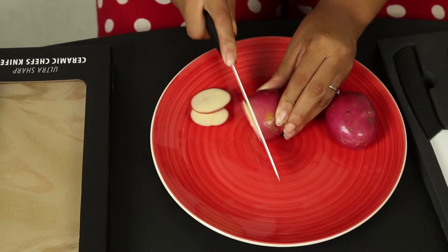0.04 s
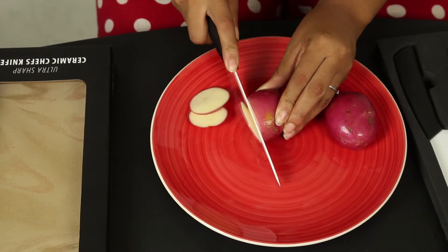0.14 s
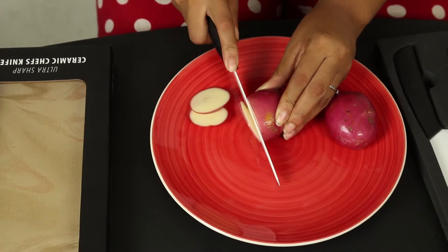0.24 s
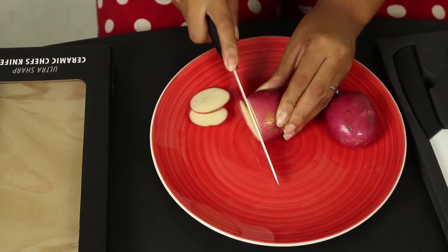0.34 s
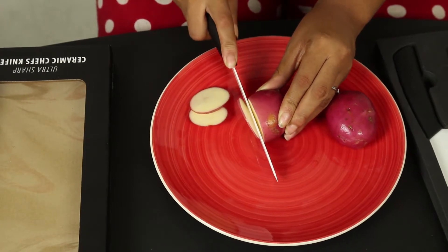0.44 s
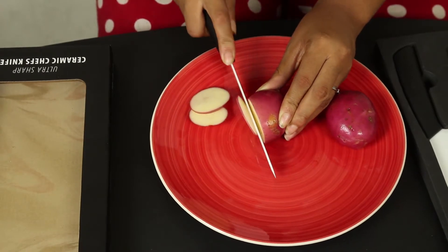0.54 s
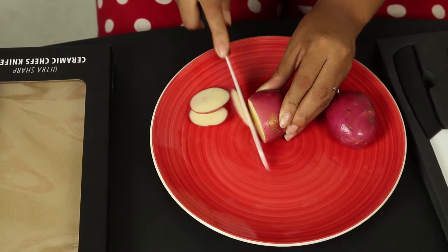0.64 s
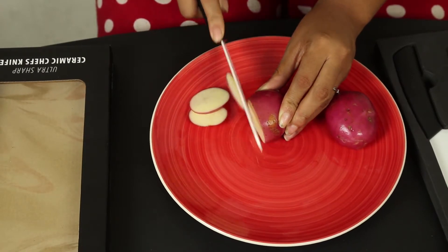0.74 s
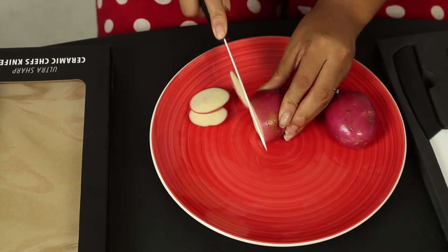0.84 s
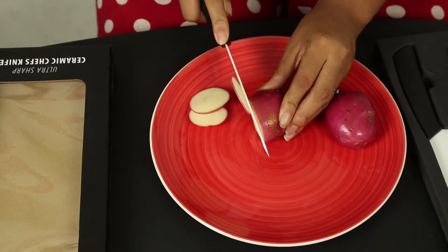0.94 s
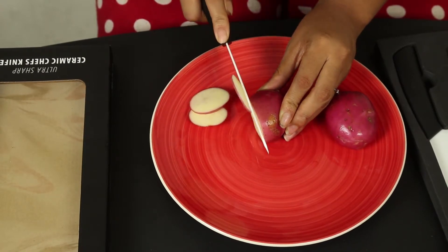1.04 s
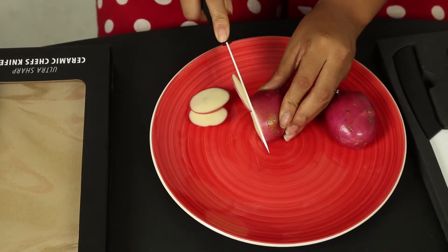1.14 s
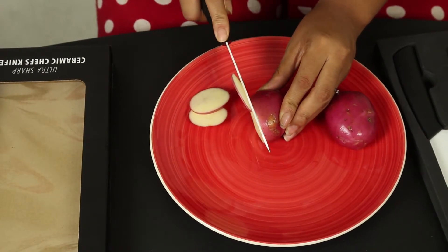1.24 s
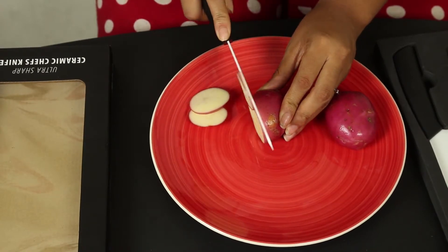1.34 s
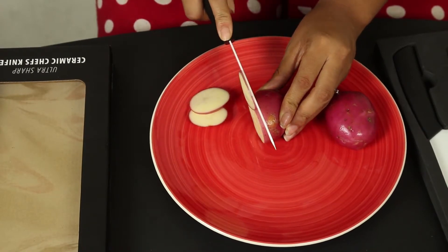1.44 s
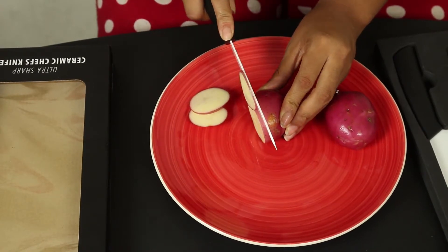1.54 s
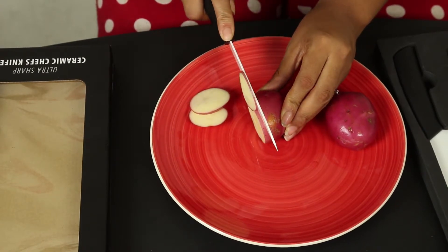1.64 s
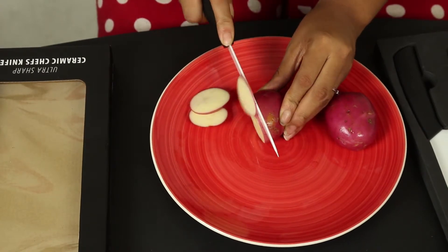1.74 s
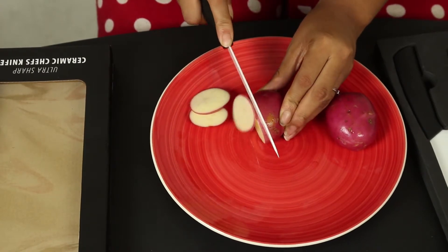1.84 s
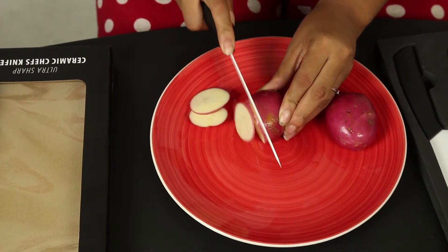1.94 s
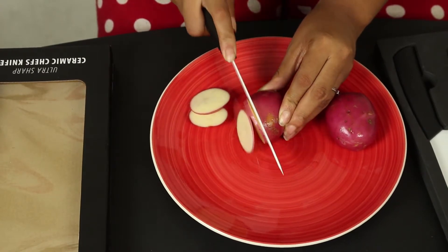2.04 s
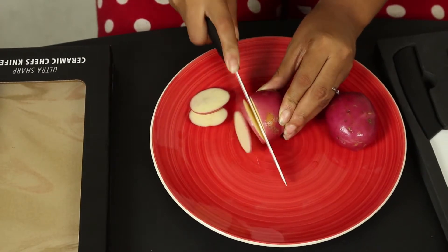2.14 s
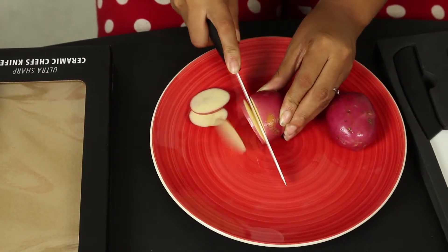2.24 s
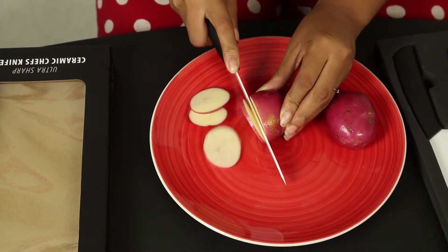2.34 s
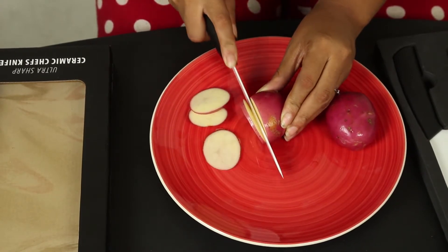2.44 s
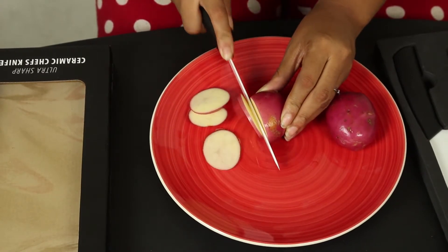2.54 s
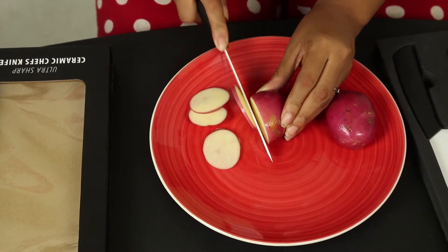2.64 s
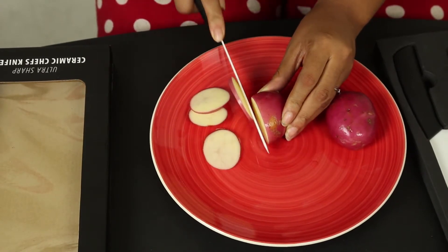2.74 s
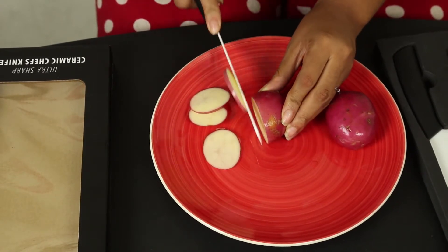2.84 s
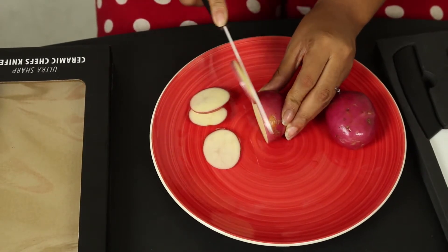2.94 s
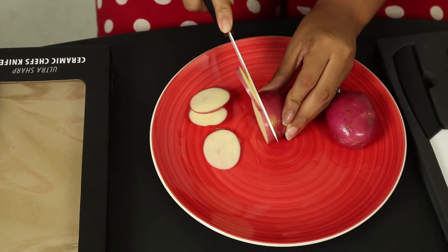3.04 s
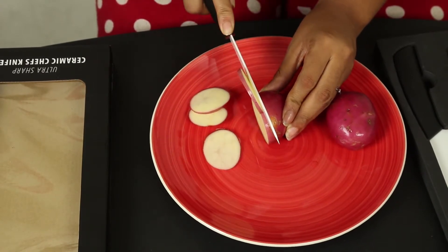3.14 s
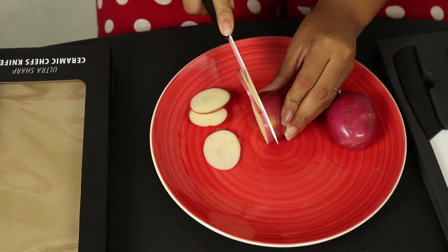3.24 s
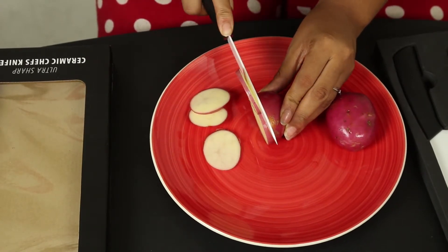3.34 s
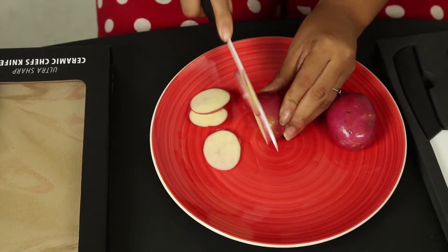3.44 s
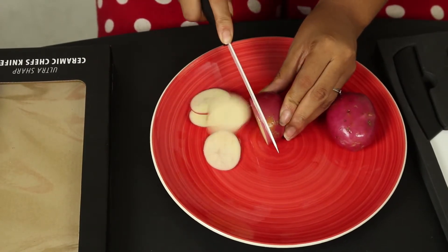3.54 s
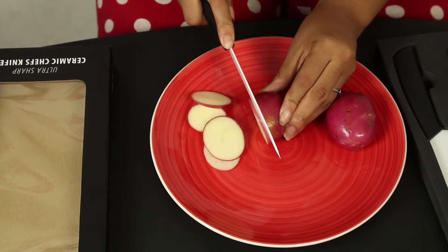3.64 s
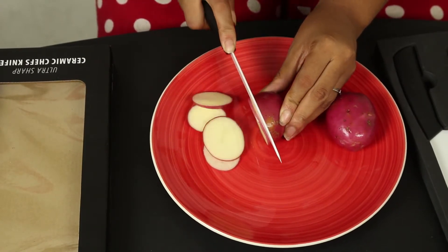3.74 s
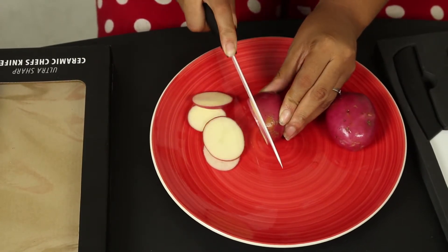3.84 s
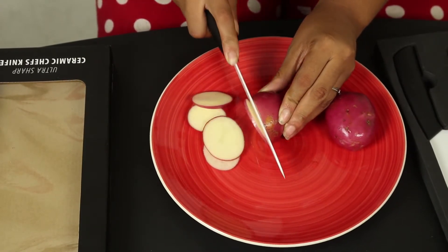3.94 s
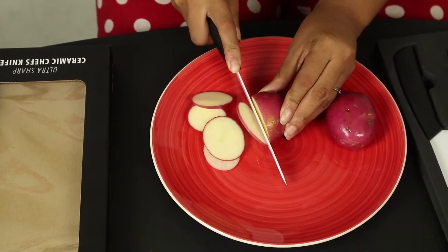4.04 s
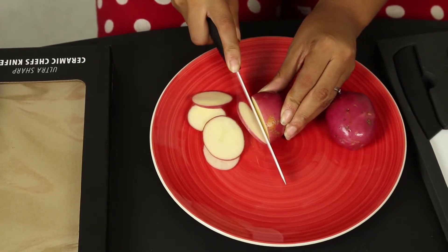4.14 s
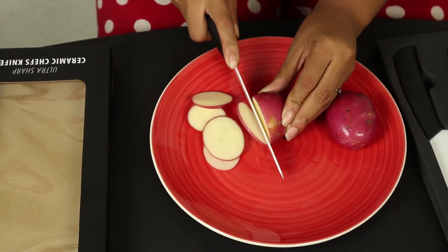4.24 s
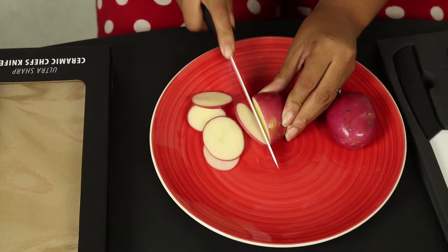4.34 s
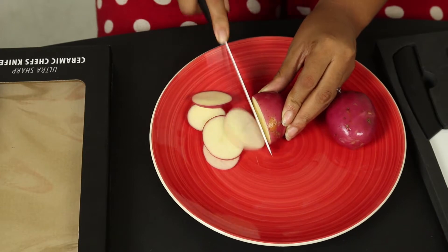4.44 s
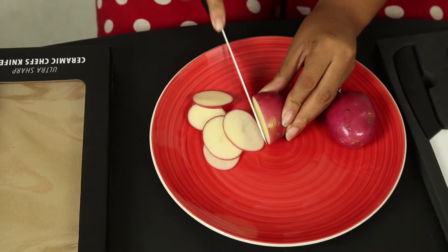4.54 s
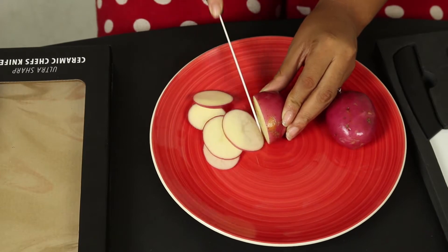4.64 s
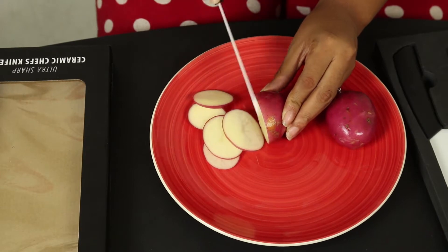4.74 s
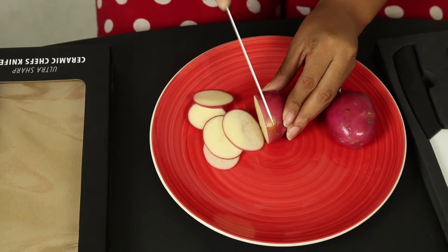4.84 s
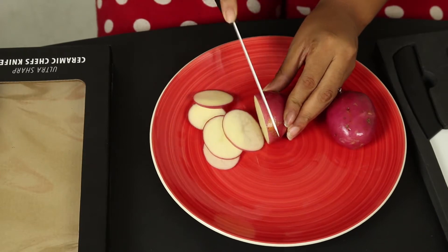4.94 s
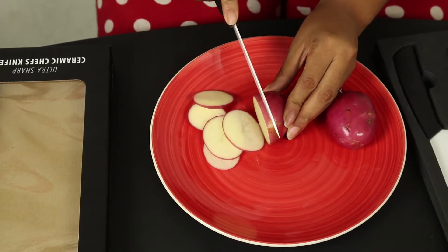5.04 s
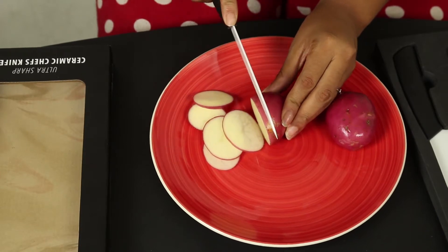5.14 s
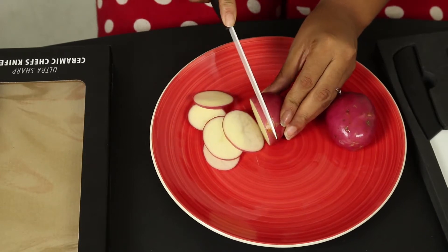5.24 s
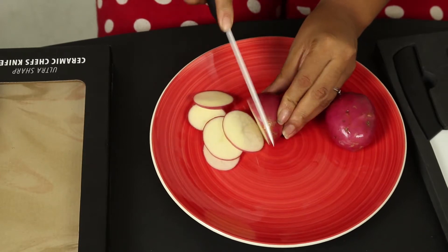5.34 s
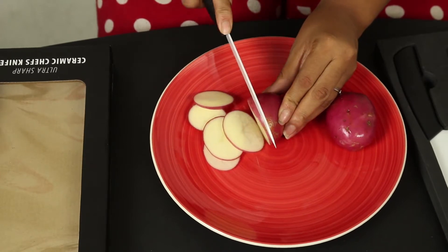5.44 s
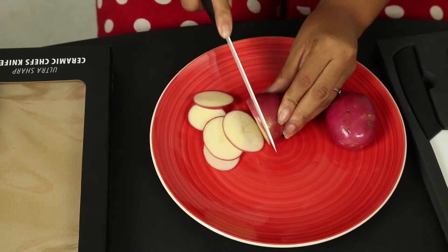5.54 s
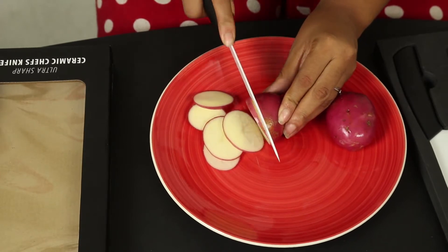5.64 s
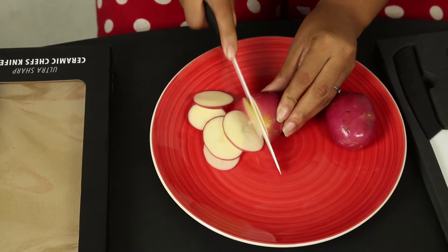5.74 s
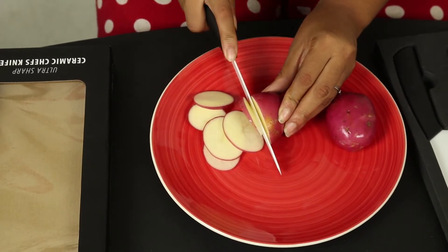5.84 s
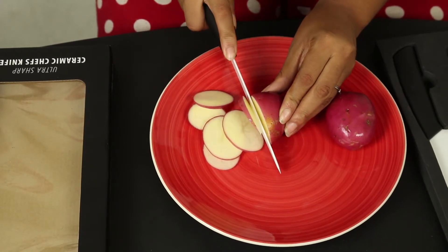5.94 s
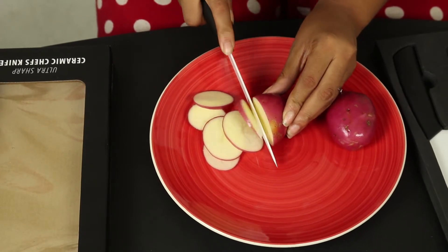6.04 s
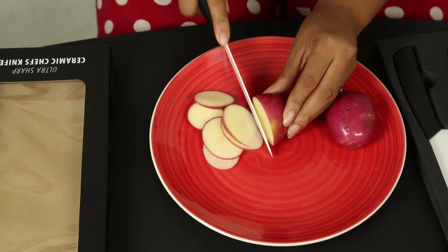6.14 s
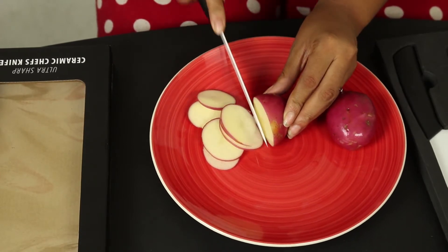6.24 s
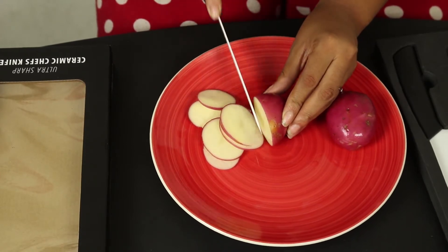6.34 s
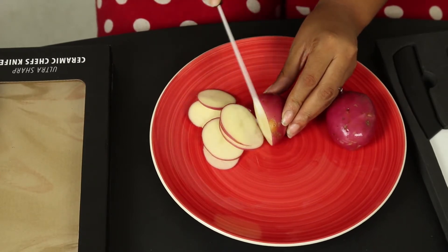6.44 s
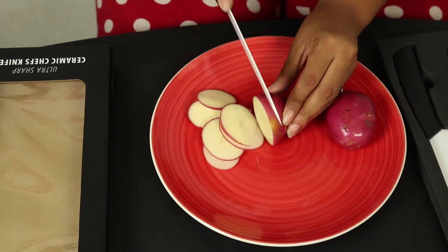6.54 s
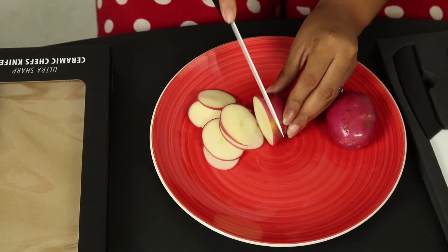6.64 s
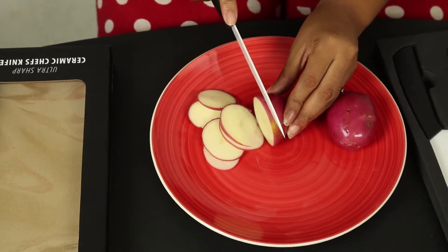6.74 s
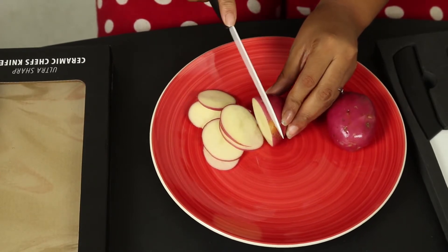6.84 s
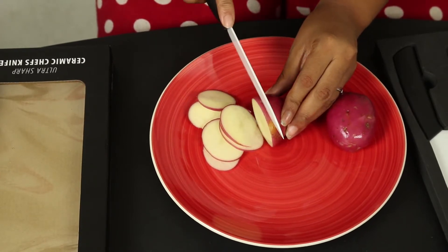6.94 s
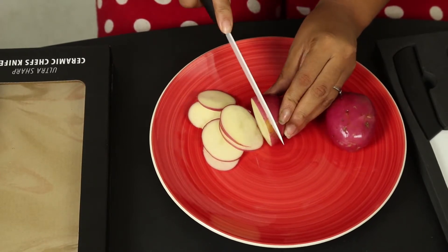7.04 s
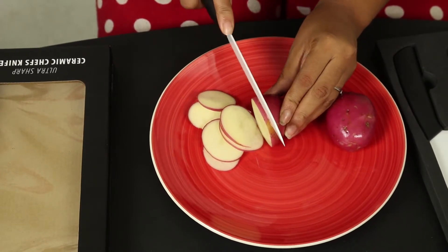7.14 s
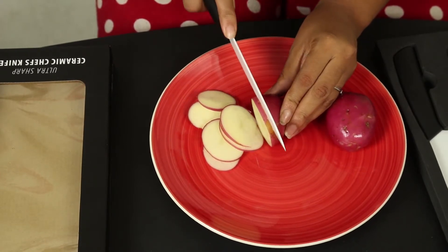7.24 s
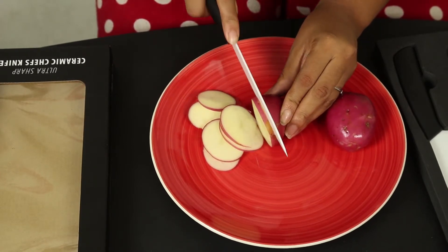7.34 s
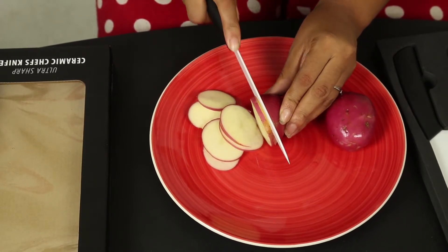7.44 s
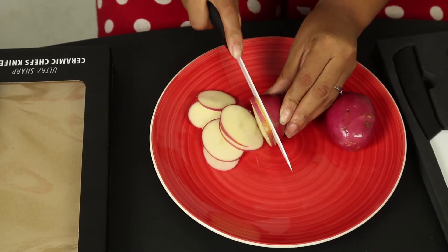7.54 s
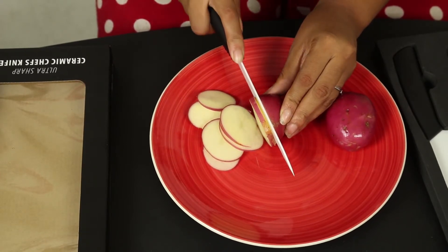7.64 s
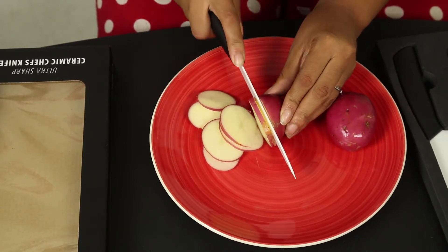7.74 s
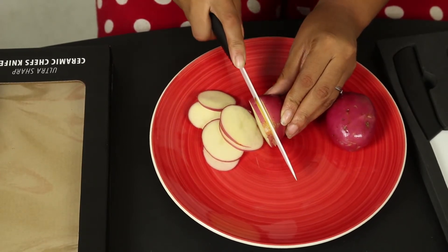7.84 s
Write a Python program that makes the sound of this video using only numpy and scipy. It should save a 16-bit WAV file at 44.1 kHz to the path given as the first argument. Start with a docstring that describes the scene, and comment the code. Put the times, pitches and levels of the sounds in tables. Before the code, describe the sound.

A ceramic knife slices raw potatoes on a glazed plate, heard close in a small kitchen with a short echo and a steady, soft hum of appliances and air. A faint wet cut opens, followed by a light scrape and tiny ticks around 0.5 seconds. At 1.8 seconds the skin crunches, the blade hisses through the flesh, and at 2.2 it hits the plate with a very loud, slightly distorted clack. A ringing scrape and a tap follow. Another crunch at 3.5 leads to a second hard knock at 4.1, then gritty scraping and sharp clicks around 4.5. The third cut starts at 5.4 and ends in the strongest knock at 5.8, with scraping and a tap until 6.3. Dull thumps through the table accompany the work. From about 7 seconds comes a softer crunch and quiet, moist slicing.

```python
"""A quiet kitchen, close up: a ceramic knife slices raw potatoes on a glazed plate.
The edge crunches through the skin, hisses through the wet flesh and knocks on the plate hard enough
to clip, then scrapes over the glaze and sets it ringing. Edge and falling slices tap lightly;
slices and hands thump the table. A small room rings over a soft hum of appliances and air."""
import sys
import numpy as np
from scipy import signal
from scipy.fft import rfft, irfft, next_fast_len
from scipy.io import wavfile
from scipy.ndimage import uniform_filter1d

SR = 44100
rng = np.random.default_rng(int(sys.argv[2]) if len(sys.argv) > 2 else 0)


def digitize_waveform(pressure):
    """Quantize a signal to 16-bit integers and store it at the path in sys.argv[1].

    Rows of a 2-D input are taken as channels; values are limited to [-1, 1].
    """
    field = np.atleast_2d(pressure).T
    bounded = np.clip(field, -1, 1)
    quanta = np.round(bounded * 32767).astype(np.int16)
    wavfile.write(sys.argv[1], SR, quanta)


N = 347949
TIME = np.arange(N) / SR

# tone of the appliance and air noise: frequency_hz, level_db
HUM_EQ = [(12, -30), (20, 0), (81, -3), (154, -3.5), (311, -6.5), (400, -5), (435, -7), (529, -14),
          (2200, -25), (2400, -27.5), (3170, -25), (3450, -27), (16100, -36.5)]
# thin whines in the hum: centre_hz, width_hz, level_db
WHINE_BANDS = [(2420, 70, -70.5), (3370, 40, -77)]
# stereo width of the room, side against mid: frequency_hz, side_db
WIDTH_EQ = [(60, -16), (400, -9), (2000, 2), (8000, -1)]
# blade through flesh, hiss set against ring: start_s, length_s, first_db, last_db, swell_db, hiss_db
CUT_STROKES = [(0.0, 0.16, -50.5, -38.5, -7.5, -4), (1.928, 0.27, -46.5, -40, -12.5, -2),
               (3.635, .2, -50.5, -67, -1, -3.5), (3.865, .195, -52.5, -43, 4, -5),
               (5.572, 0.22, -52.5, -42, -5.5, -2.5), (7.2, .19, -65.5, -58.5, 2.5, -3.5),
               (7.44, 0.16, -54, -56.5, 0.5, -3.5), (7.6, 0.21, -56, -57, 0.5, -7.5)]
# edge breaking the skin: start_s, level_db, crunch_s, plate_share_db
SKIN_BITES = [(1.766, -35, 0.021, -9), (3.489, -39, 0.024, 1.5), (5.389, -40.5, 0.026, 1),
              (7.06, -43, 0.033, 1)]
# tone of the wet flesh: frequency_hz, level_db
FLESH_EQ = [(290, -49.5), (500, -18.5), (1020, -31.5), (1400, -8.5), (2010, -17.5), (2330, -12),
            (2930, -12.5), (5020, -13), (16000, -21.5)]
# plate ringing along under the cut: pitch_hz, width_hz, level_db
CUT_MODES = [(1416, 90, -1), (2353, 80, -1.5), (3333, 68, -15), (3800, 100, -8), (5690, 130, -15),
             (8150, 300, -15)]
# soft blows through the table: start_s, level_db, pitch_hz, t60_s
TABLE_THUMPS = [(0.048, -45, 417, 0.43), (1.763, -36, 220.4, 0.21), (1.864, -44.5, 174.5, 0.81),
                (2.202, -28.5, 115, 0.13), (2.635, -35.5, 351, 0.17), (3.074, -46, 153, 0.17),
                (3.484, -37.5, 221, 0.24), (3.619, -40, 169.3, 0.41), (4.062, -25, 114, 0.096),
                (4.437, -36, 347, 0.47), (4.588, -36.5, 348, 0.11), (4.995, -44.5, 151.3, 0.14),
                (5.389, -42, 154, 0.33), (5.803, -24, 194, 0.17), (6.155, -28.5, 374, 0.2),
                (6.713, -47, 159, 0.19), (7.059, -44.5, 140, 0.13)]
# edge tapping and slices falling flat: start_s, peak_db, centre_hz, fade_s, plate_share_db
LIGHT_TAPS = [(.366, -40.5, 1586, 0.016, -10), (.628, -27, 7200, .003, -14), (.682, -25.5, 6500, .003, -11),
              (2.640, -18.5, 1450, 0.0041, -9), (3.620, -43, 2510, 0.0067, -20),
              (3.646, -37, 3500, 0.0062, -11), (4.438, -19.5, 1530, 0.014, -4),
              (4.586, -8, 2606, 0.0045, -4.5), (6.158, -12.5, 2420, 0.015, -10)]
# plate under the sliding edge: pitch_hz, width_hz, level_db
RUBBED_MODES = [(1335, 86, -2.5), (1656, 260, -9.5), (1985, 240, -4.5), (2298, 220, 1), (2522, 350, -6),
                (3170, 140, -8.5), (3967, 290, -1.5), (5260, 300, -14), (5700, 310, -12.5),
                (7853, 400, -25.5), (6817, 135, -6), (8600, 180, -13.5), (11330, 190, -23.5)]
# edge over glaze, hiss set against ring: start_s, length_s, first_db, last_db, swell_db, hiss_db
SCRAPE_STROKES = [(.405, 0.13, -47, -49, 5.5, -20), (.505, 0.17, -51, -37.5, 9, -20.5),
                  (2.4, 0.25, -40, -33, 4, -21), (2.652, 0.041, -33, -53, 2, -13),
                  (2.755, 0.037, -48, -54, 0, -15), (4.24, 0.15, -42.5, -28, 2.5, -20),
                  (4.416, 0.018, -36, -23.5, -1, -21), (4.45, 0.032, -35, -51, -4, -23),
                  (4.514, 0.074, -30, -26.5, 0.5, -10), (4.6, 0.041, -28.5, -54, -7, -16),
                  (6.03, 0.048, -39.5, -39.5, 6.5, -20), (6.082, 0.063, -29, -24.5, -3.5, -32),
                  (6.172, 0.045, -22.5, -35.5, -10, -31), (6.233, 0.087, -23.5, -35.5, 0, -10.5)]
# blade hitting the plate: start_s, level_db, tilt_db_per_octave, low_modes_db, mid_modes_db, chatter_s
PLATE_KNOCKS = [(2.1988, 2, -1, -2.5, -2, 0.016), (4.0658, 0, -3.5, -2.5, -1.5, 0.018),
                (5.8048, 3.5, -0.5, 4, 3.5, 0.017)]
# plate struck by the blade: pitch_hz, width_hz, level_db
KNOCK_MODES = [(1402.5, 320, -10), (1562, 260, -8), (1950, 220, -22), (2219, 86, -12.5), (2344, 140, 0.5),
               (2939, 120, -17), (3260, 260, -15.5), (3767, 160, -2), (3908, 150, -2.5), (4570, 31, -20),
               (4970, 33, -17), (5048, 390, -3.5), (5256, 220, -5), (5855, 230, -18), (6780, 84, 1.5),
               (7700, 190, -21), (8957, 450, -8), (9200, 370, -33), (10670, 160, -26), (12200, 910, -31.5),
               (14300, 280, -29.5)]
# tone of a knock's crack: frequency_hz, level_db
CRACK_EQ = [(59, -54), (100, -17), (1910, -4.5), (2320, 1), (3190, -13), (3700, 8), (5650, -11),
            (9020, -34.5), (16000, -39.5)]


def undb(db):
    """Decibels to gain."""
    return 10 ** (np.asarray(db) / 20)


def level(x, db):
    """Set the RMS level."""
    return x * undb(db) / np.sqrt(np.mean(x ** 2))


def equalise(x, points):
    """Shape the spectrum along (frequency_hz, level_db) points."""
    size = next_fast_len(x.shape[-1])
    hz, db = np.transpose(points)
    bin_hz = np.arange(size // 2 + 1) * SR / size
    gain = undb(np.interp(np.log(bin_hz + 1), np.log(hz), db))
    return irfft(rfft(x, size) * gain, size)[..., :x.shape[-1]]


def band(x, hz, width_hz):
    """A resonance with gain 1 at its centre."""
    return signal.lfilter(*signal.iirpeak(hz, hz / width_hz, SR), x)


def add(out, start_s, sound):
    """Mix a sound in at its cue."""
    start = int(start_s * SR)
    out[:, start:start + sound.shape[-1]] += sound[..., :N - start]


def room_noise(samples):
    """Stereo noise, centred in the bass and wide in the treble."""
    mid, side = rng.standard_normal((2, samples))
    return mid + equalise(side, WIDTH_EQ) * np.array([[1], [-1]])


def appliance_hum(bed_db=-52):
    """A soft bed of appliance and air noise with two thin whines."""
    air = room_noise(N)
    whine = sum(level(band(air, hz, width_hz), db) for hz, width_hz, db in WHINE_BANDS)
    return level(equalise(air, HUM_EQ), bed_db) + whine


def stroke_envelopes(strokes, attack_s, release_db_per_s):
    """Ring and hiss gains: each stroke ramps from first to last level, swelling or dipping midway."""
    ring, hiss = np.zeros((2, N))
    for start_s, length_s, first_db, last_db, swell_db, hiss_db in strokes:
        age = TIME - start_s
        progress = np.clip(age / length_s, 0, 1)
        db = first_db + (last_db - first_db) * progress + swell_db * np.sin(np.pi * progress)
        release_db = release_db_per_s * np.maximum(age - length_s, 0)
        stroke = undb(db - release_db) * np.clip(age / attack_s, 0, 1)
        ring = np.maximum(ring, stroke)
        hiss = np.maximum(hiss, stroke * undb(hiss_db))
    return ring, hiss


def grit(spread_db, flicker_db, flicker_hz):
    """Dense one-sample grains of uneven size under a flickering pressure."""
    hold = int(SR / flicker_hz)
    steps = np.repeat(rng.standard_normal(N // hold + 1), hold)
    pressure = uniform_filter1d(steps, hold)[:N]
    grain_size = np.minimum(rng.exponential(size=N), 4)
    return rng.standard_normal(N) * undb(spread_db * grain_size + flicker_db * pressure)


def plate_ring(force, modes, low_cut_hz=1180):
    """The plate's resonances at unit RMS; it radiates little below its lowest mode."""
    out = 0
    for k, (hz, width_hz, db) in enumerate(modes):
        ring = band(force, hz, width_hz)
        ring = (-1) ** k * undb(db) * (.7 * ring + band(ring, hz, 1.5 * width_hz))
        # each mode reaches left and right up to two samples apart
        out = out + np.array([np.roll(ring, 2), np.roll(ring, rng.integers(0, 5))])
    low_cut = signal.butter(6, low_cut_hz, "high", fs=SR, output="sos")
    return level(signal.sosfilt(low_cut, out), 0)


def slicing(swell_db=7, swell_s=.015, shake_db=-17, shake_s=.05):
    """Cells burst along the edge: a crunch at the skin, then a wet hiss; the plate rings along."""
    ring, hiss = stroke_envelopes(CUT_STROKES, attack_s=.012, release_db_per_s=598)
    for knock_s, *_ in PLATE_KNOCKS:  # hiss and ring swell briefly around each knock
        swell = undb(swell_db * np.exp(-np.abs(knock_s - TIME) / swell_s))
        ring, hiss = ring * swell, hiss * swell
    crunch, push = np.zeros((2, 1, N))
    t = TIME[:SR // 4]
    attack = np.minimum(t / .0015, 1)
    for start_s, level_db, crunch_s, plate_share_db in SKIN_BITES:
        burst = undb(level_db) * attack * np.exp(-(t / crunch_s) ** 1.8)
        shake = undb(level_db + shake_db) * attack * np.exp(-t / shake_s)  # the plate shakes on
        add(crunch, start_s, burst)
        add(push, start_s, burst * undb(plate_share_db) + shake)
    cells = grit(spread_db=1.8, flicker_db=2, flicker_hz=60)
    wet = level(equalise(cells, FLESH_EQ), 0) * (hiss + crunch)
    return wet + plate_ring(cells, CUT_MODES) * (ring + push)


def table_thumps():
    """Dull blows: the table top answers with a low mode and a loose rattle that lasts twice as long."""
    out, t = np.zeros((2, N)), TIME[:SR // 2]
    attack = np.minimum(t / .0015, 1)
    for start_s, level_db, pitch_hz, t60_s in TABLE_THUMPS:
        mode = np.sin(2 * np.pi * pitch_hz * t) * 1000. ** (-t / t60_s)
        rattle = band(rng.standard_normal(len(t)), .69 * pitch_hz, 180)
        rattle = level(band(rattle, 210, 310), -4.5) * 1000. ** (-t / (2 * t60_s))
        add(out, start_s, undb(level_db) * (mode + rattle) * attack)
    return out


def light_taps():
    """Edge or slice lands: a sharp tick with a trace of rattle and a short ring of the plate."""
    out, t = np.zeros((2, N)), TIME[:SR // 8]
    for start_s, peak_db, hz, fade_s, plate_share_db in LIGHT_TAPS:
        force = .15 * rng.standard_normal(len(t)) * np.exp(-t / fade_s)
        force[0] += 1  # first contact
        tick = band(band(force, hz, 1.3 * hz), .8 * hz, .46 * hz)
        tick /= np.max(np.abs(tick))
        ring = plate_ring(tick, RUBBED_MODES)
        ring /= np.max(np.abs(ring))
        add(out, start_s, undb(peak_db) * (tick + undb(plate_share_db) * ring))
    return out


def glaze_scrapes():
    """The edge stutters over the glaze, ringing the plate and spitting grit."""
    rub, spit = stroke_envelopes(SCRAPE_STROKES, attack_s=.0045, release_db_per_s=406)
    drag = grit(spread_db=1.6, flicker_db=1.8, flicker_hz=110)
    hiss = level(band(band(drag, 7500, 3800), 9100, 7400), .75)
    return rub * plate_ring(drag, RUBBED_MODES) + spit * hiss


def plate_knocks(skid_db=-23.5, skid_s=.078):
    """The blade lands with a crack, then chatters and skids on the glaze, keeping the ring rough."""
    out, t = np.zeros((2, N)), TIME[:SR // 2]
    for start_s, level_db, tilt_db_per_octave, low_db, mid_db, chatter_s in PLATE_KNOCKS:
        friction, snap = rng.standard_normal((2, len(t)))
        chatter = np.exp(-t / chatter_s) + .48 * np.exp(-t / .0052)
        skid = undb(skid_db) * np.exp(-t / skid_s)
        force = friction * (chatter + skid)
        force[0] += 12  # the blow itself
        modes = []
        for hz, width_hz, db in KNOCK_MODES:
            tilt_db = tilt_db_per_octave * np.log2(hz / 3000)
            trim_db = low_db * (hz < 2000) + mid_db * (2000 < hz < 3000)
            modes.append((hz, width_hz, db + tilt_db + trim_db))
        ring = plate_ring(force, modes)
        ring /= np.sqrt(np.mean(ring[:, :SR // 100] ** 2))  # unit RMS over the first 10 ms
        crack = level(equalise(snap, CRACK_EQ), -5) * np.exp(-t / .01)
        add(out, start_s, undb(level_db) * (ring + crack))
    return out


def kitchen_reverb(x, bass_t60_s=.45, treble_t60_s=.25, wet_db=-6):
    """Dense small-room echoes; the treble spreads wider and dies first."""
    t = TIME[:SR // 2]
    echoes = room_noise(len(t))
    bass = signal.lfilter([.3], [1, -.7], echoes)
    treble = echoes - bass
    tail = bass * 1000. ** (-t / bass_t60_s) + treble * 1000. ** (-t / treble_t60_s)
    tail *= np.minimum(t / .00083, 1)
    tail /= np.sqrt(np.sum(tail ** 2) / 2)
    return undb(wet_db) * signal.fftconvolve(x, tail, axes=1)[:, :N]


def scene():
    """Close knife work, its echoes and the hum beneath."""
    close = plate_knocks() + light_taps() + slicing() + glaze_scrapes() + table_thumps()
    return close + kitchen_reverb(close) + appliance_hum()


def record(dry, high_cut_hz=15900):
    """The knocks clip hard at full scale; a steep filter takes off the very top."""
    high_cut = signal.ellip(8, .2, 60, high_cut_hz, fs=SR, output="sos")
    return signal.sosfilt(high_cut, np.clip(dry, -1, 1))


dry = scene()
out = record(dry)
digitize_waveform(out)
```